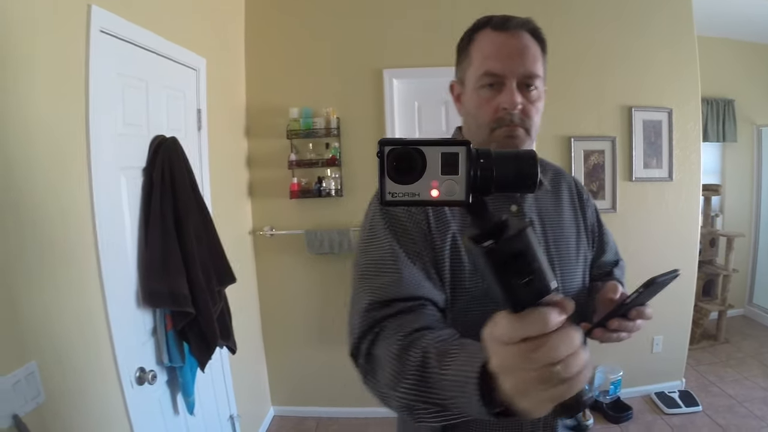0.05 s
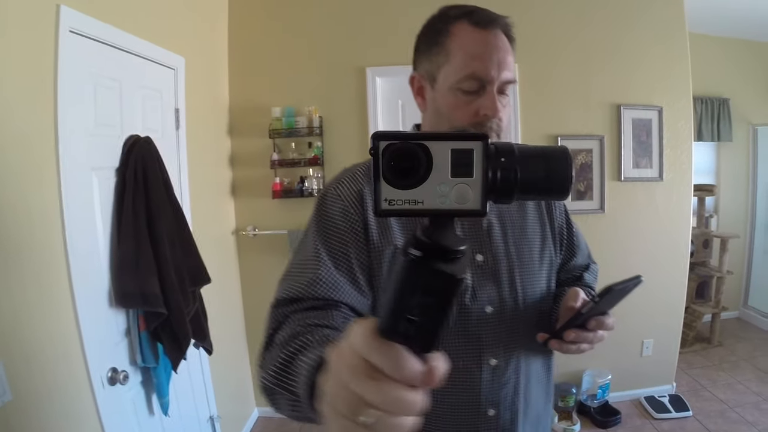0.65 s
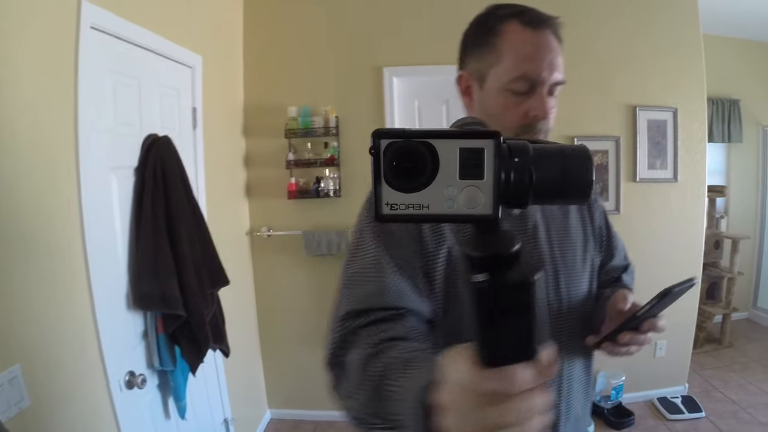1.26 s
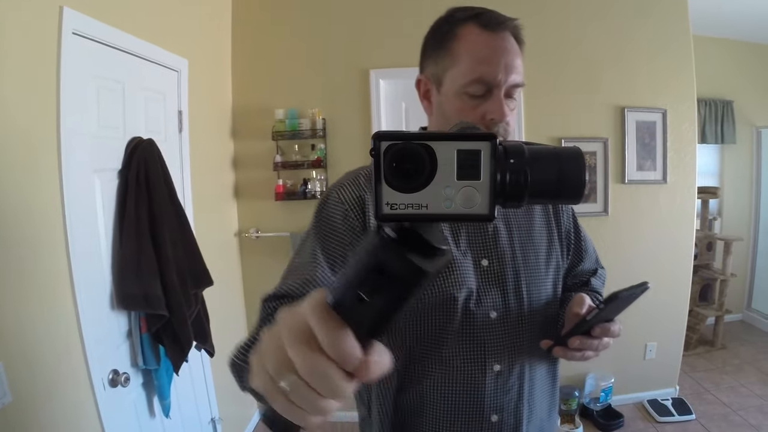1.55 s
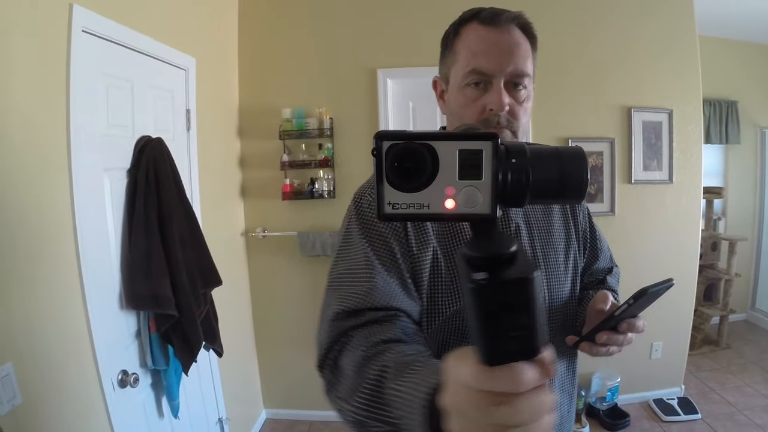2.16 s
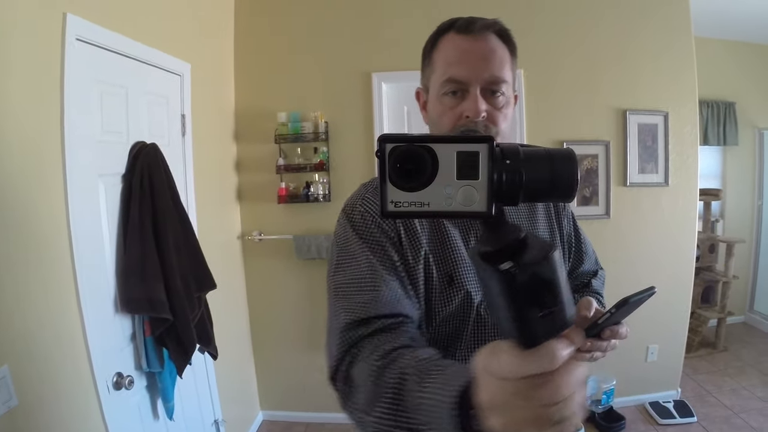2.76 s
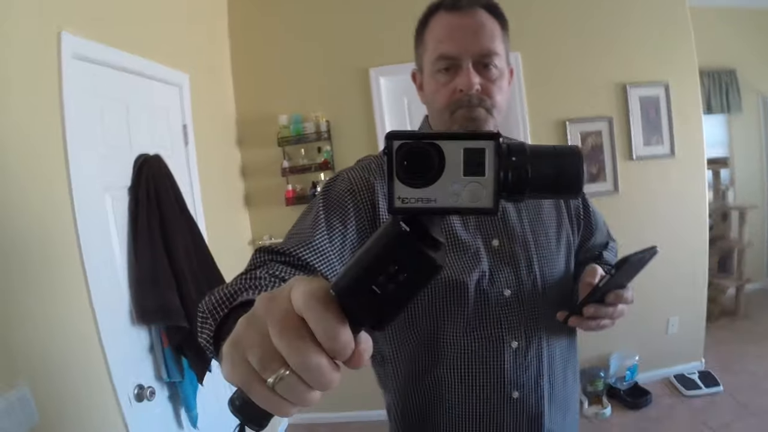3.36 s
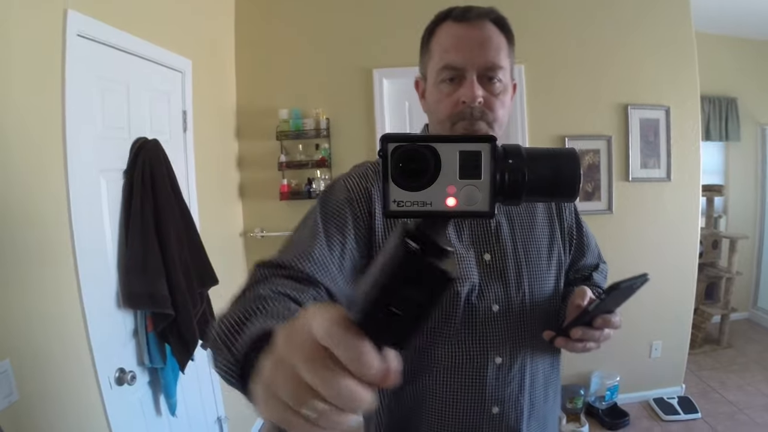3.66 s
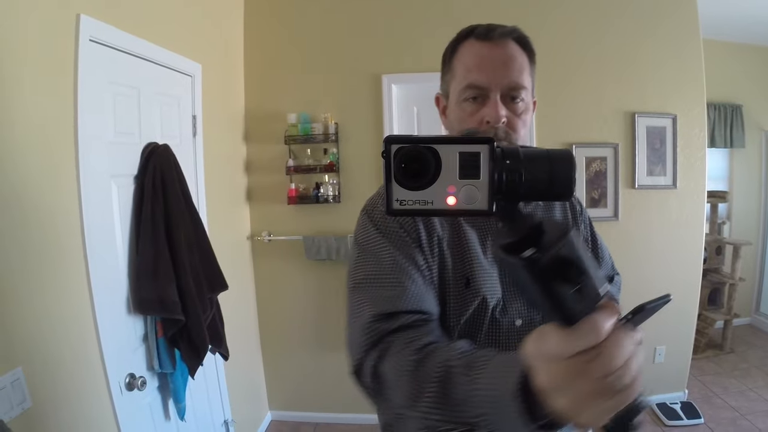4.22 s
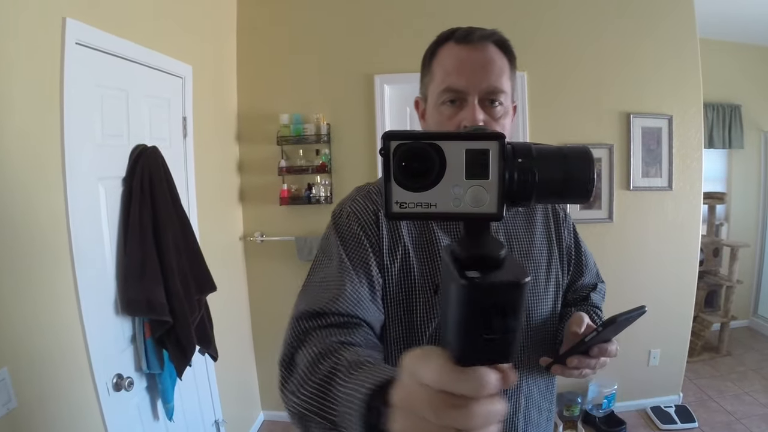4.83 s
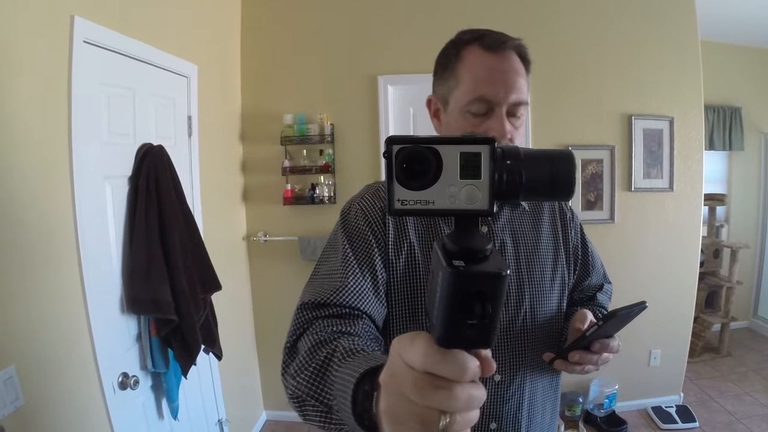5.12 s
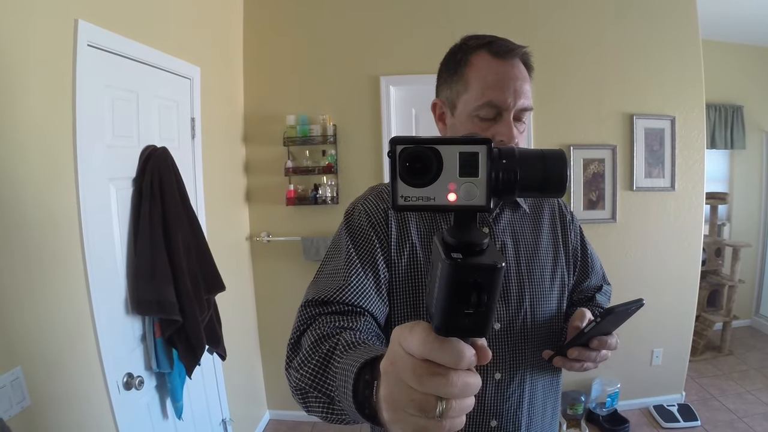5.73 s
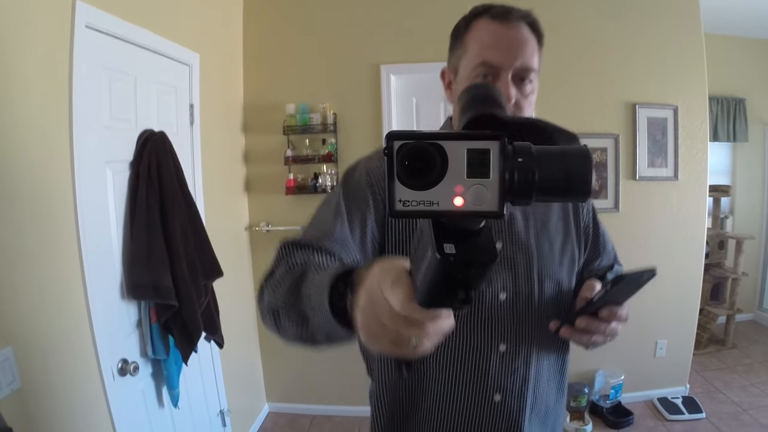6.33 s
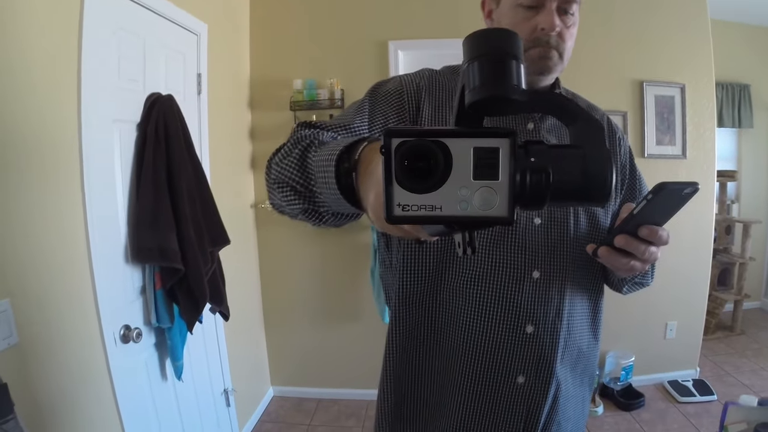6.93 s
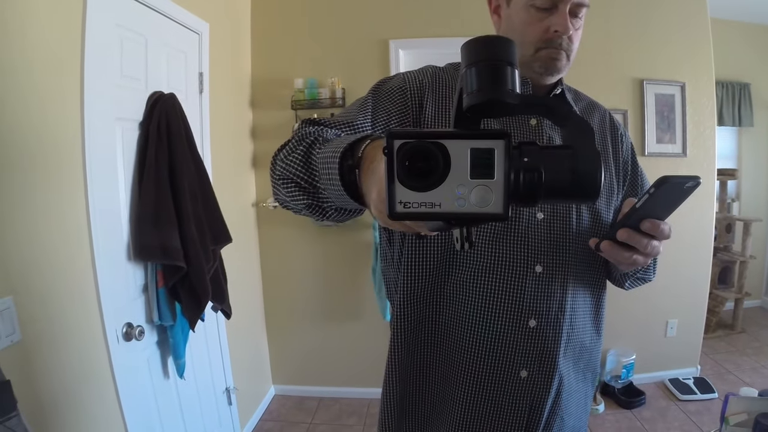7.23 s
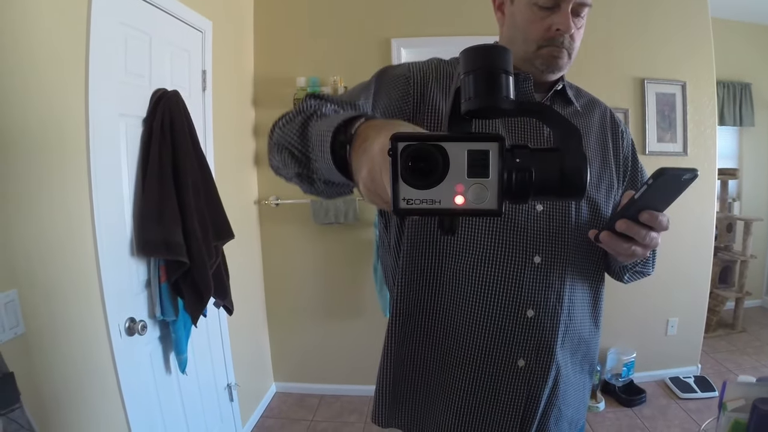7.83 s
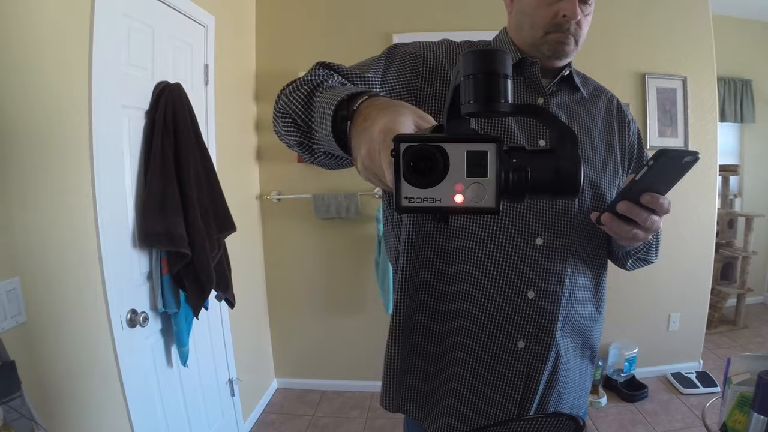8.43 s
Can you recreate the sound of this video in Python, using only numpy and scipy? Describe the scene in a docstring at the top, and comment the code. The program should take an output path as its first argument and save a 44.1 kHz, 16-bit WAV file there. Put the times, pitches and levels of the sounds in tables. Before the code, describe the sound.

Two small motors in a handheld camera gimbal hum at nearly the same low pitch, throbbing against each other over a soft whirr. About three seconds in, the arm hits its end stop with a sharp clack, rattles and settles with a small bump. Later come soft low thuds as the grip is tipped, and the motors buzz slightly harder. Everything sounds close and dry, picked up right on the gimbal indoors.

```python
"""In a room, right on the frame of a handheld camera gimbal, where everything sounds close and dry.
Two small motors hum at nearly the same pitch and throb against each other, over a soft whirr.
Swung far to one side, the arm knocks on its end stop, rattles and settles with a small bump.
Later the hand tips the grip forward with soft thuds, and the motors strain and buzz."""
import sys
import numpy as np
from scipy import signal
from scipy.fft import rfft, irfft, next_fast_len
from scipy.io import wavfile

SR = 44100
rng = np.random.default_rng(int(sys.argv[2]) if len(sys.argv) > 2 else 0)


def to_wav(s):
    """Save 16-bit WAV."""
    ch = np.atleast_2d(s).T  # columns
    pcm = np.round(np.clip(ch, -1, 1) * 32767)  # PCM
    wavfile.write(sys.argv[1], SR, pcm.astype(np.int16))


N = 382788

# The room's echo. Each row: frequency in Hz, seconds it takes to fade by 60 dB.
ROOM_FADE = [(100, 0.4), (1000, 0.15), (4000, 0.17), (14000, 0.2)]
# The tone of the faint high hiss. Each row: frequency in Hz, level in dB per Hz.
HISS_TONE = [(8500, -135), (10100, -111.5), (13000, -114.5), (15000, -128)]
# The whirr of the drives and the air of the room. Each row: frequency in Hz, level in dB per Hz.
WHIRR_TONE = [(10, -70), (28, -70.5), (45, -76.5), (110, -76.5), (230, -79), (430, -80.5), (1000, -83),
              (1500, -81.5), (2100, -86.5), (3000, -93), (4200, -96.5), (6200, -104.5), (8500, -111),
              (12500, -116.5), (15000, -123)]
# How the whirr changes under strain. Each row: frequency in Hz, change in dB.
WHIRR_CHANGE = [(700, -.5), (900, 0.5), (1150, -0.2), (1700, -1.5), (2500, 0), (5000, .5), (8500, -0.5)]
# Pitches at which the frame boosts the whirr. Each row: pitch in Hz, width in Hz, boost in dB.
FRAME_PEAKS = [(72, 9.4, 7), (190, 32, 7), (257, 18, 4), (328, 24, 5.5), (405, 48, 5), (490, 32, 4),
               (571, 8.4, 5.5), (630, 14, 6.5), (690, 26, 6), (823, 9, 3.5)]
# Soft low thuds: the arm's small settling bump, then the hand turning the grip.
# Each row: middle in seconds, peak level in dB, pitch in Hz, half-length in seconds.
THUDS = [(3.634, -30.5, 262, 0.0055), (3.66, -47, 55, 0.031), (6.52, -43, 52, .035),
         (6.61, -38, 62.2, .035), (6.665, -41, 46, .035), (6.73, -41, 56, .035), (6.885, -40, 88.3, .035),
         (7.08, -43, 64, 0.054), (8.06, -45.5, 56, .035)]
# Short rattles of a loose joint. Each row: middle in seconds, level in dB, half-length in seconds.
RATTLES = [(3.473, -47, 0.007), (3.58, -48, 0.0045), (3.635, -40, 0.0041), (3.659, -46.5, 0.015)]
# The arm hits its stop and bounces, then bumps lightly. Each row: start in seconds, dull push in dB,
# ring in dB, crack in dB, frequency in Hz above which the blow loses its treble.
BLOWS = [(3.3616, -6.5, -1.5, -9, 11000), (3.374, -5.7, -8.5, -11.6, 14300), (3.3778, -30, -5, -16.3, 4200),
         (3.3808, -6.8, -8, -18, 8500), (3.3828, -34, -16.5, -21, 12900), (3.3859, -13, -8.5, -28.4, 4000),
         (3.3975, -37, -25.7, -35, 2900), (3.6235, -30, -23, -40, 1900), (5.9998, -32, -31, -37, 2500)]
# The notes that the arm and the camera housing ring with.
# Each row: pitch in Hz, level in dB, seconds it takes to fade by 60 dB.
HOUSING_NOTES = [(230, -20.5, .09), (411, -33, .05), (556, -25.5, .043), (720, -29, .03), (950, -25, .06),
                 (1075, -21.5, .075), (1280, -16.5, .041), (1546, -29, .026), (1904, -23.5, .041),
                 (2056, -11.5, .022), (2366, -23, .02), (2696, -25, .02), (3600, -27, .019),
                 (4700, -27.5, .02), (5222, -42, .051), (7424, -31, .019), (10440, -24, .011),
                 (13355, -34, .014)]
# The tone of the crack where the arm hits. Each row: frequency in Hz, relative level in dB.
CRACK_TONE = [(100.0, -1), (1100.0, 5), (1650.0, 0.5), (2200.0, -2.2), (3300.0, -23), (5000.0, -14),
              (5900.0, -26), (7500.0, -13), (9500.0, -24), (15000.0, -25)]
# The motors drift in pitch, so the throb hurries and drags.
# Each row: time in seconds, first motor's pitch in Hz, second motor's pitch in Hz.
MOTOR_PITCHES = [(0, 134.15, 141.05), (1, 134.13, 141.3), (1.8, 134.33, 141.2), (2.7, 134.36, 140.94),
                 (3.7, 134.2, 141.22), (5, 134.33, 141.3), (5.8, 134.66, 141.28), (7, 134.33, 141.22),
                 (8.7, 134.19, 141.15)]
# The higher tones in each hum. Each row: multiple of the motor's pitch, first motor's level in dB,
# second motor's level in dB. Levels are relative to that motor's lowest tone.
MOTOR_OVERTONES = [(2, -10.3, -5), (3, -22.5, -15.5), (4, -30, -21), (5, -30, -27), (6, -26, -29),
                   (7, -28, -33), (10, -32, -38)]


def gain_of(db):
    """Turns decibels into a number to multiply a sound by."""
    return 10 ** (np.asarray(db) / 20)


def evened(x):
    """Scales a signal to an average (rms) size of 1."""
    return x / np.sqrt(np.mean(x ** 2) + 1e-20)


def read(points, hz):
    """Reads between the rows of a table, giving each octave about equal space."""
    f, value = np.transpose(points)
    return np.interp(np.log(hz + 1), np.log(f + 1), value)


def add(mix, start_s, sound):
    """Mixes a sound in at a given time."""
    part = mix[round(start_s * SR):][:len(sound)]
    part += sound[:len(part)]


def noise(colour_db):
    """Noise shaped by a function that gives the level, in dB per Hz, at each frequency."""
    size = next_fast_len(N)
    hz = np.fft.rfftfreq(size, 1 / SR)
    spectrum = rfft(rng.standard_normal(size)) * gain_of(colour_db(hz))
    return irfft(spectrum, size)[:N] * np.sqrt(SR / 2)


def noise_band(centre_hz, half_width_hz):
    """A narrow band of noise around one pitch."""
    return noise(lambda hz: -10 * np.log10(1 + ((hz - centre_hz) / half_width_hz) ** 4))


def waver(rate_hz):
    """A random wobble of average size 1, mostly slower than the given rate."""
    return evened(noise(lambda hz: -20 * np.log10(1 + (hz / rate_hz) ** 2)))


def swell(middle_s, half_s):
    """A smooth rise to 1 and fall back, shaped like a bell."""
    return np.exp(-((np.arange(N) / SR - middle_s) / half_s) ** 2)


def strain(start_s=6.36, takes_s=0.33):
    """How hard the motors work: 0 with the grip upright, rising to 1 as it tips forward."""
    return np.clip((np.arange(N) / SR - start_s) / takes_s, 0, 1)


def room(sound, delay_s=0.008):
    """The room adds a short, blurred echo in which the bass lasts longest."""
    hz, t, spectrum = signal.stft(rng.standard_normal(SR // 2), SR, nperseg=256)
    fade = gain_of(-60 * t / read(ROOM_FADE, hz)[:, None]) * (t > delay_s)
    tail = signal.istft(spectrum * fade, SR, nperseg=256)[1]
    return signal.fftconvolve(sound, tail / np.linalg.norm(tail))[:N]


def hiss():
    """A faint, very high hiss swells and fades once."""
    return noise(lambda hz: read(HISS_TONE, hz)) * swell(middle_s=5.7, half_s=0.5)


def mains_hum(hz=120.02, level_db=-59.5):
    """The room's electric supply hums faintly on one steady note."""
    return gain_of(level_db) * np.sqrt(2) * np.sin(2 * np.pi * hz * np.arange(N) / SR)


def whirr(flicker_db=0.45):
    """The drives make a soft noise that the frame colours. It shifts a little under strain."""
    def colour_db(hz):
        boost_db = sum(db / (1 + (2 * (hz - f) / width) ** 2) for f, width, db in FRAME_PEAKS)
        return read(WHIRR_TONE, hz) + boost_db
    effort = strain()
    upright = noise(colour_db)
    tipped = noise(lambda hz: colour_db(hz) + read(WHIRR_CHANGE, hz))
    blend = np.sqrt(1 - effort) * upright + np.sqrt(effort) * tipped
    return blend * gain_of(flicker_db * waver(4.3))


def soft_thuds():
    """The arm settles, then the hand turns the grip. Each thud is a few vibrations that swell and fade."""
    t = np.arange(N) / SR
    out = np.zeros(N)
    for middle_s, db, hz, half_s in THUDS:
        out += gain_of(db) * swell(middle_s, half_s) * np.sin(2 * np.pi * (hz * t + rng.random()))
    return out


def joint_rattle():
    """A loose joint buzzes briefly around one pitch as the arm swings back."""
    buzz = evened(noise_band(centre_hz=1030, half_width_hz=130))
    return buzz * sum(gain_of(db) * swell(middle_s, half_s) for middle_s, db, half_s in RATTLES)


def housing_ring(t, snap_s, snap_hz=3000, snap_db=-6):
    """A hard snap sets the arm and housing ringing with many notes that quickly die away."""
    snap_shape = np.exp(-(2 * (t - snap_s) / snap_s) ** 2)
    snap = gain_of(snap_db) * np.cos(2 * np.pi * snap_hz * (t - snap_s)) * snap_shape
    after = np.maximum(t - snap_s, 0)
    notes = sum(gain_of(db - 60 * after / fade_s) * np.sin(2 * np.pi * hz * after)
                for hz, db, fade_s in HOUSING_NOTES)
    return snap - notes


def knocks(snap_s=0.0003, push_s=0.0005, push_lag_s=0.00025, push_db=6,
           crack_s=0.0009, chatter_db=-17, chatter_s=0.016, give_hz=55):
    """Each blow shoves the camera, cracks and rings the housing while loose joints chatter."""
    t = np.arange(SR // 4) / SR
    hz = np.fft.rfftfreq(2 * len(t), 1 / SR)
    push_age = np.maximum(t - snap_s - push_lag_s, 0) / push_s
    push = -gain_of(push_db) * push_age * (2 - push_age) * np.exp(-push_age)  # out and back
    ring = housing_ring(t, snap_s)
    crack_fade = np.exp(-t / crack_s) + gain_of(chatter_db) * np.exp(-t / chatter_s)
    out = np.zeros(N)
    for start_s, dull_db, ring_db, crack_db, bright_hz in BLOWS:
        spectrum = rfft(rng.standard_normal(2 * len(t))) * gain_of(read(CRACK_TONE, hz))
        crack = crack_fade * evened(irfft(spectrum))[:len(t)]
        blow = gain_of(dull_db) * push + gain_of(ring_db) * ring + gain_of(crack_db) * crack
        # a gentler blow stays in contact longer and so loses its treble
        add(out, start_s, signal.lfilter(*signal.butter(2, bright_hz, fs=SR), blow))
    # the hand gives way to the slowest motion, which takes out the deepest bass
    return signal.lfilter(*signal.butter(2, give_hz, "highpass", fs=SR), out)


def motors(levels_db=(-43.2, -48.3), in_step_s=0.05, jitter_turns=0.012, flutter_db=0.7, fade_db=2.2,
           strain_hum_db=1.1, strain_buzz_db=5, octave_trade=0.68, rasp_db_per_hz=-84, rasp_growth=1.1):
    """Two hums a few Hz apart slip in and out of step and throb. Their overtones throb faster."""
    effort = strain()
    buzz_db = strain_buzz_db * effort
    # a rough rasp around the third multiple of the pitch grows quickly with strain
    out = noise_band(centre_hz=413, half_width_hz=41) * gain_of(rasp_db_per_hz + rasp_growth * buzz_db)
    times, *pitches = np.transpose(MOTOR_PITCHES)
    for motor, (hz, level_db) in enumerate(zip(pitches, levels_db)):
        turns = np.cumsum(np.interp(np.arange(N) / SR, times, hz)) / SR
        turns -= turns[round(in_step_s * SR)]  # both hums line up at this moment
        # the motor's small steadying moves shake the timing and blur the high overtones
        turns += jitter_turns * waver(9.2)
        hum = np.cos(2 * np.pi * turns)
        for multiple, *overtone_db in MOTOR_OVERTONES:
            # under strain the octave gets weaker and the higher overtones get stronger
            strain_db = buzz_db if multiple > 2 else -octave_trade * buzz_db
            # each overtone also fades in and out by itself
            strength = gain_of(overtone_db[motor] + strain_db + fade_db * waver(7))
            hum += strength * np.cos(2 * np.pi * multiple * turns)
        out += gain_of(level_db + strain_hum_db * effort + flutter_db * waver(6.3)) * np.sqrt(2) * hum
    return out


def scene(room_db=-25):
    """The gimbal's sounds reach the microphone through the frame; the room adds little."""
    clack = knocks() + joint_rattle()
    close = motors() + whirr() + mains_hum() + hiss() + soft_thuds() + clack
    return (close + gain_of(room_db) * room(clack))[None]


def record(dry, low_cut_hz=35, high_cut_hz=15300):
    """The microphone thins the deep bass, clips at full scale and loses the highest treble."""
    heard = signal.sosfilt(signal.butter(1, low_cut_hz, "highpass", fs=SR, output="sos"), dry)
    low_pass = signal.firwin(127, high_cut_hz, window=("kaiser", 9), fs=SR)
    return signal.oaconvolve(np.clip(heard, -1, 1), low_pass[None], "same")


dry = scene()
out = record(dry)
to_wav(out)
```